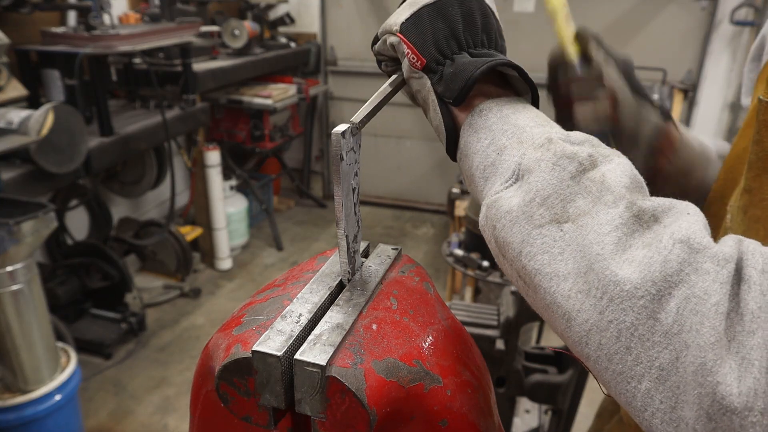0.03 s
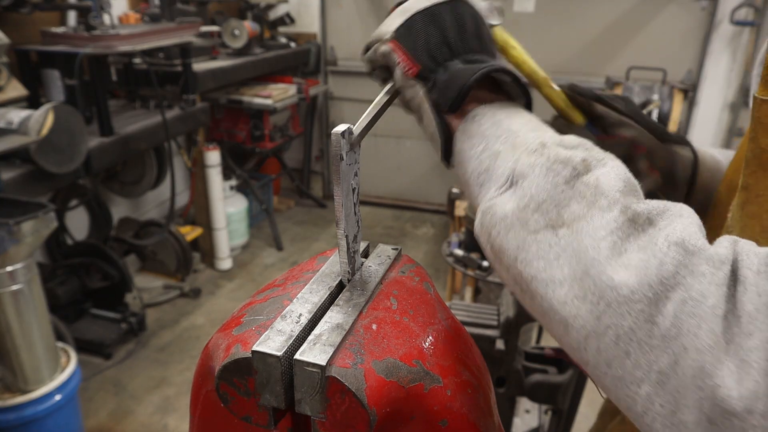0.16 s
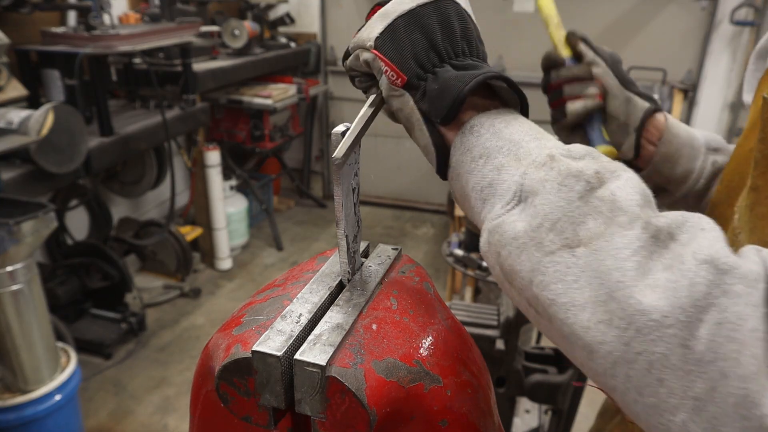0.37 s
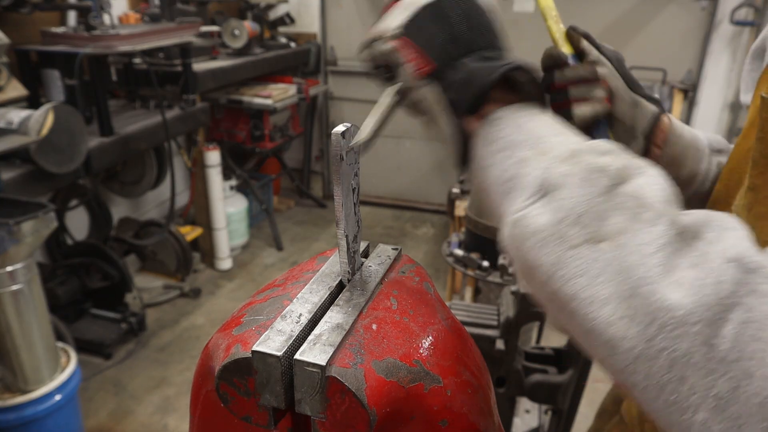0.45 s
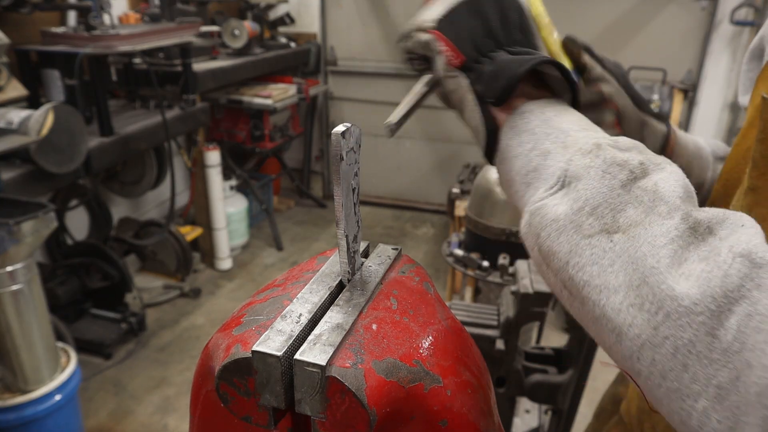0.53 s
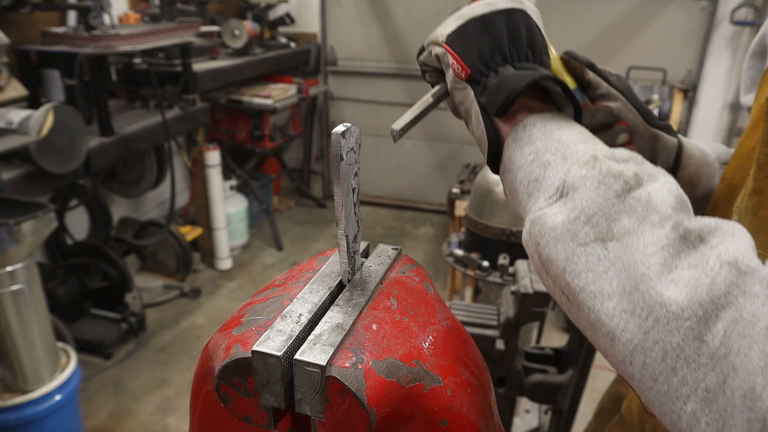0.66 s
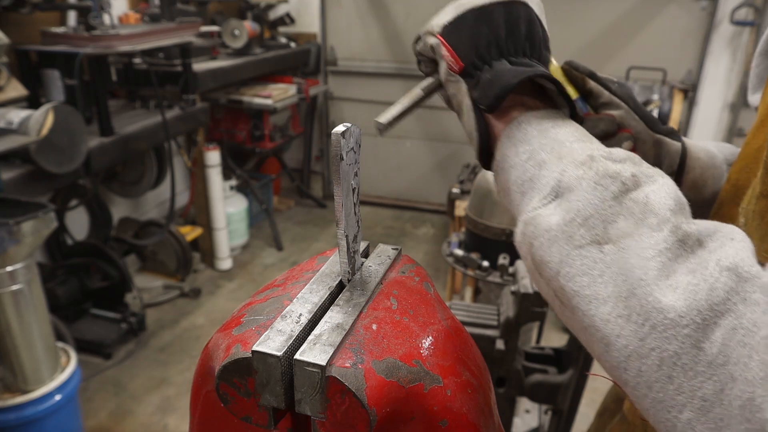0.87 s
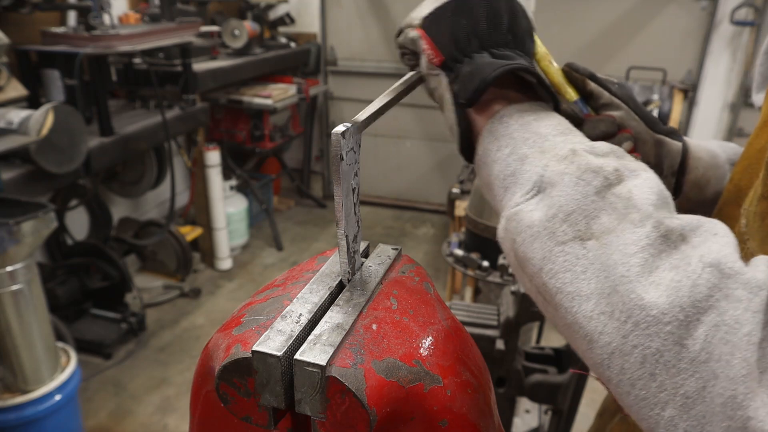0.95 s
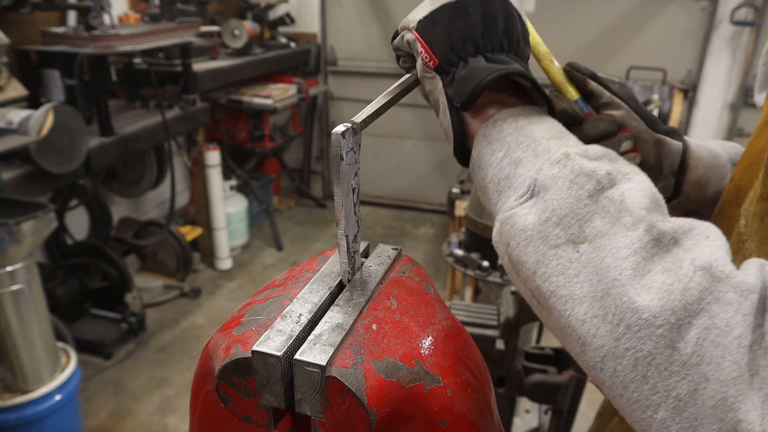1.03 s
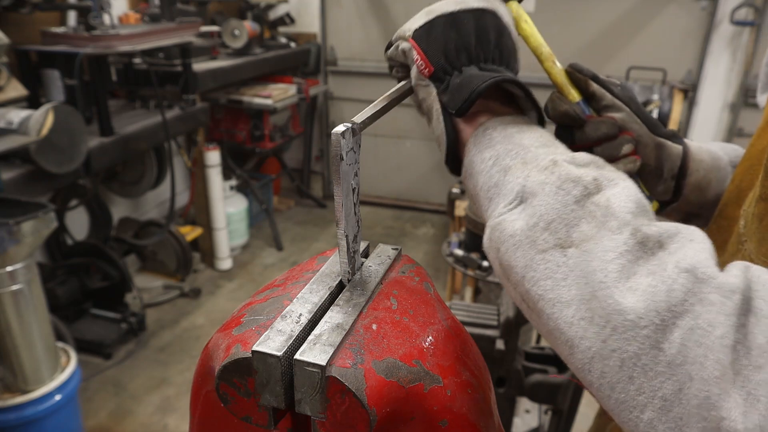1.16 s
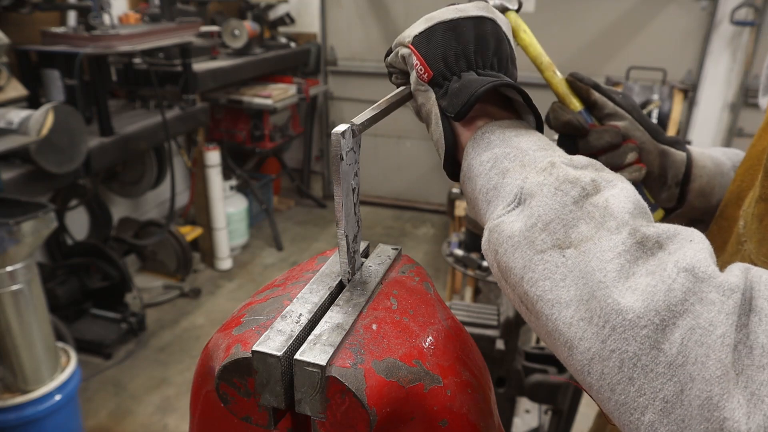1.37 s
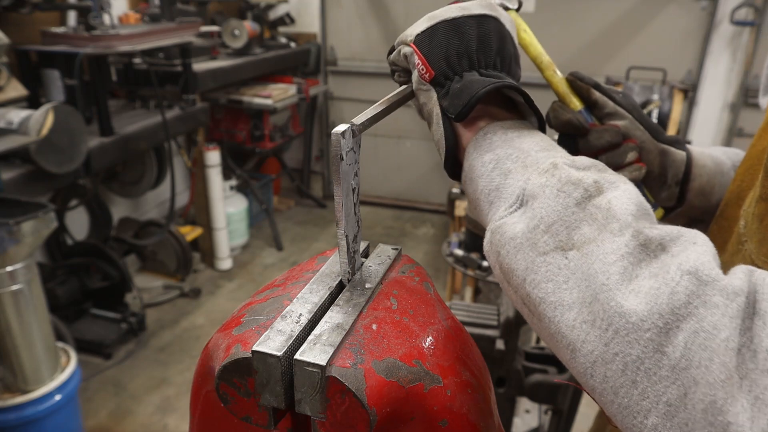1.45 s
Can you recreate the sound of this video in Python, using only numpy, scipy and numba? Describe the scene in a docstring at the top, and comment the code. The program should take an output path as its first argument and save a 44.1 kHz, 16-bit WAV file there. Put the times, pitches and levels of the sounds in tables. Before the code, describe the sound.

One hard, ringing hammer blow on a chisel, then two soft steel clinks in a workshop.

```python
"""In a hard-walled workshop, a hammer drives a steel chisel against a bar clamped in a heavy vise.
One hard blow with a small rebound is followed by two light taps as the chisel is set back on the bar,
then a tiny tick of the grip. Each hit cracks, sets the steel ringing and echoes round the room,
over faint air noise and mains hum. The hard blow overloads the microphone, and its limiter
(an automatic volume control) holds the ring down."""
import sys
import numpy as np
from scipy import signal
from scipy.fft import rfft, irfft
from scipy.io import wavfile
from numba import njit

SR = 44100
rng = np.random.default_rng(int(sys.argv[2]) if len(sys.argv) > 2 else 0)


def waveform_to_disk(signal):
    """Save audio, clipped to [-1, 1], as 16-bit WAV at the path in sys.argv[1]."""
    frames = np.transpose(np.atleast_2d(signal))
    scaled = np.clip(frames, -1, 1) * 32767
    samples = np.round(scaled).astype(np.int16)
    wavfile.write(sys.argv[1], SR, samples)


N = 66150
T = np.arange(N) / SR
FREQS = np.maximum(np.fft.rfftfreq(N, 1 / SR), 1)


def undb(db):
    """Turn decibels into a number to multiply by."""
    return 10 ** (np.asarray(db) / 20)


def lookup(table, hz):
    """Read between the rows of a table, with pitch spaced in octaves."""
    freqs, values = np.array(table, float).T
    return np.interp(np.log(hz), np.log(freqs), values)


def fade(t60):
    """Die away smoothly; t60 is the time in seconds to fall by 60 dB."""
    return np.exp(-np.log(1000) * T / t60)


def unit(x):
    """Scale a signal to an average (rms) level of 1."""
    return x / np.sqrt(np.mean(np.abs(x) ** 2))


def noise(gain):
    """Noise with the given strength at each frequency."""
    return irfft(rfft(rng.standard_normal(N)) * gain, N)


def burst(colour, t60):
    """A short puff of noise that starts near level 1 and fades."""
    envelope = fade(t60)
    return unit(noise(colour) * envelope) * np.sqrt(np.mean(envelope ** 2))


def around(centre_hz, octaves=.71):
    """A bell-shaped band of frequencies around one pitch."""
    return np.exp(-.5 * (np.log2(FREQS / centre_hz) / octaves) ** 2)


def placed(sound, start_s):
    """Delay a sound to its moment."""
    return np.concatenate([np.zeros(int(start_s * SR)), sound])[:N]


def contact(hz, cutoff_hz, slope):
    """A softer hit lasts longer, so it stirs up less treble above the cutoff."""
    return 1 / np.sqrt(1 + (hz / cutoff_hz) ** (2 * slope))


def room_tone(air_db=-65.5, hum_db=-68.5, hum_hz=59.5):
    """Faint air noise and the hum of mains electricity."""
    # tone of the air noise: f/Hz, relative level/dB
    air_spectrum = [(25, -10.5), (60, -7), (150, -7.5), (400, -10), (1000, -13), (2000, -18), (4000, -26.5),
                    (8000, -31), (15500, -32)]
    air = unit(noise(undb(lookup(air_spectrum, FREQS))))
    hum = unit(np.sin(2 * np.pi * hum_hz * T))
    return undb(air_db) * air + undb(hum_db) * hum


def crack(centre_hz, t60, splash_db, cutoff_hz, rise_s=.000067):
    """Steel meets steel: two brief, gritty tones and a splash of hiss, duller for a softer hit."""
    phase = 2 * np.pi * centre_hz * T
    tones = (np.sin(phase) + undb(.5) * np.sin(1.6 * phase)) * fade(t60)
    grit = undb(1) * burst(around(centre_hz), t60)
    splash = undb(splash_db) * burst(1, t60)
    onset = 1 - np.exp(-T / rise_s)
    band = signal.butter(4, [302, cutoff_hz], "bandpass", fs=SR, output="sos")
    return signal.sosfilt(band, (tones + grit + splash) * onset)


def ring(notes, cutoff_hz, rise_s=.003, room_t60=.6):
    """Struck steel rings at its own notes. Echoes blur them; those that outlast the room end pure."""
    out = np.zeros(N)
    for hz, db, t60 in notes:
        width_hz = .016 * hz
        narrow_noise = unit(noise(1 / (1 + ((FREQS - hz) / width_hz) ** 2)))
        blur = .59 * narrow_noise * fade(min(t60, room_t60))
        tone = np.sin(2 * np.pi * hz * T) * fade(t60)
        out += undb(db) * contact(hz, cutoff_hz, slope=1.3) * (tone + blur)
    return out * (1 - np.exp(-T / rise_s))


def knock():
    """The vise body gives for a few milliseconds as it takes the load."""
    # notes of the dull knock: f/Hz, relative level/dB, t60/s
    knock_notes = [(131, -25, .02), (1400, 4, .006)]
    return sum(undb(db) * np.sin(2 * np.pi * hz * T) * fade(t60) for hz, db, t60 in knock_notes)


def room_wash(cutoff_hz, bands=12, rise_s=.002):
    """Countless rings and echoes of the workshop blend into noise; the highest treble dies first."""
    # tone of tools, bench and walls together: f/Hz, relative level/dB
    wash_spectrum = [(40, -29.5), (110, -14), (200, -8.5), (320, 0), (700, 2), (1200, 3), (1800, 2.5),
                     (2600, 3), (3700, -1.5), (5200, -13), (8000, -18.5), (15000, -14.5)]
    # how long the room sounds at each pitch: f/Hz, t60/s
    wash_decay = [(60, .5), (250, .65), (1000, 0.56), (2500, 0.51), (4500, .6), (8000, 0.27), (14000, .3)]
    colour = unit(undb(lookup(wash_spectrum, FREQS))) * contact(FREQS, cutoff_hz, slope=2.9)
    spectrum = rfft(rng.standard_normal(N)) * colour
    centres = np.geomspace(60, 15000, bands)
    out = np.zeros(N)
    for hz, this_band in zip(centres, np.eye(bands)):
        share = np.interp(np.log(FREQS), np.log(centres), this_band)
        out += irfft(spectrum * share, N) * fade(lookup(wash_decay, hz))
    onset = 1 - np.exp(-T / rise_s)
    early_boost = 1 + undb(5) * fade(.037)
    return out * onset * early_boost


def blows():
    """Each hit cracks, rings the steel parts and fills the room."""
    # hard blow, rebound and two taps: t/s, crack level/dB, crack f/Hz, crack t60/s,
    # splash against crack/dB, wash level/dB, cutoff f/Hz, vise/dB, bar/dB, chisel/dB, hammer/dB
    hits = [(0.2041, 8.5, 2900, 0.0069, -7.5, -10, 8680, -2, -19, -42, -31),
            (0.2197, -10.5, 3810, 0.0064, -2.5, -33.5, 14800, -38.5, -40, -8, -10.5),
            (1.0727, -28.5, 2960, 0.024, -21, -41.5, 3000, -42, -21, -37, -60),
            (1.3032, -16.5, 3956, 0.008, -6.5, -38, 4430, -48, -36, -22, -45)]
    # ringing notes of each steel part: f/Hz, relative level/dB, t60/s
    vise = [(133, -42, 2.4), (188.7, -39, 2.8), (301, -23.5, .5), (427, -21, 0.4), (538.7, -10, 0.32),
            (610, -15.5, 0.65), (844, -37, 2.3), (856.4, -21, .5), (999, -15, 0.57), (1032.1, -12, .55),
            (1275, -23.5, .6), (1496, -20.5, .45), (2068, -19.5, .58), (2197, -15, 0.49),
            (2355, -21.5, 0.58), (2950, -24.5, 0.51), (3575, -29, .62), (4510, -28, 0.47)]
    bar = [(232, -24, .35), (608, -24, 0.54), (664, -30, .45), (732, -19, 0.42), (805, -22.5, 0.2),
           (1035, -24.5, .3), (1552, -28.5, .25), (1938, -21.5, .35), (1992, -25, 0.15), (2681, -27, .35)]
    chisel = [(241, -23, .5), (320, -25.5, .8), (1077, -24, .4), (1230, -23, .4), (1293, -22.5, 0.53),
              (1327, -28, 0.64), (2132, -18, 0.4), (2772, -21.5, .3), (3010, -22.5, .45),
              (4210, -28.5, .35), (4600, -34.5, .45), (5986, -31, 0.3), (7100, -41.5, .35)]
    hammer = [(12440, -15, 0.076), (12100, -30, .33), (13900, -33.5, .2)]
    out = np.zeros(N)
    for (start_s, crack_db, crack_hz, crack_t60, splash_db, wash_db, cutoff_hz,
         vise_db, bar_db, chisel_db, hammer_db) in hits:
        parts = [(vise, vise_db), (bar, bar_db), (chisel, chisel_db), (hammer, hammer_db)]
        steel = sum(undb(db) * ring(notes, cutoff_hz) for notes, db in parts)
        steel += undb(vise_db) * knock()
        impact = undb(crack_db) * crack(crack_hz, crack_t60, splash_db, cutoff_hz)
        room = undb(wash_db) * room_wash(cutoff_hz)
        out += placed(impact + steel + room, start_s)
    return out


def grip_tick():
    """A tiny bright tick as the grip on the tools shifts."""
    # tick of the held tools: t/s, level/dB, centre f/Hz, t60/s
    ticks = [(1.471, -60, 10900, .02)]
    return sum(placed(undb(db) * burst(around(hz), t60), start_s) for start_s, db, hz, t60 in ticks)


def scene():
    """The blows and the tick over the quiet workshop, in one channel."""
    return (blows() + grip_tick() + room_tone())[None]


@njit
def follow(x, attack_s, release_s):
    """Track the loudness, rising over the attack time and falling over the release time."""
    attack, release = 1 / (attack_s * SR), 1 / (release_s * SR)
    out, level = np.empty(len(x)), 0.
    for i in range(len(x)):
        level += (x[i] - level) * (attack if x[i] > level else release)
        out[i] = level
    return out


def record(dry):
    """The limiter turns the loud ring down but is too slow for the crack, whose peaks are cut flat."""
    limit_db, ratio, top_hz = -14.5, 6, 15500
    level = follow(np.abs(dry[0]), attack_s=.0054, release_s=.04)
    gain = np.maximum(level / undb(limit_db), 1) ** (1 / ratio - 1)
    clipped = np.clip(dry * gain, -.9, .9)
    treble_cut = signal.ellip(8, .2, 70, top_hz, fs=SR, output="sos")
    return signal.sosfilt(treble_cut, clipped)


dry = scene()
out = record(dry)
waveform_to_disk(out)
```